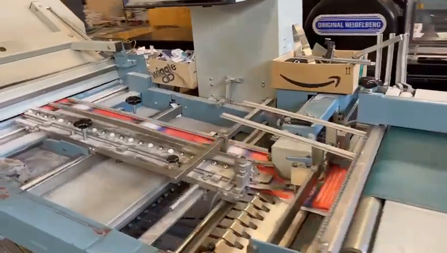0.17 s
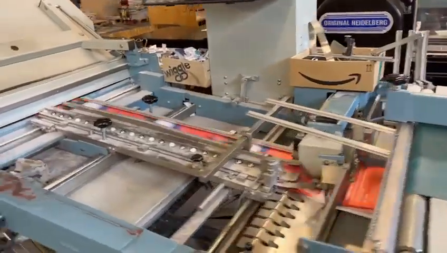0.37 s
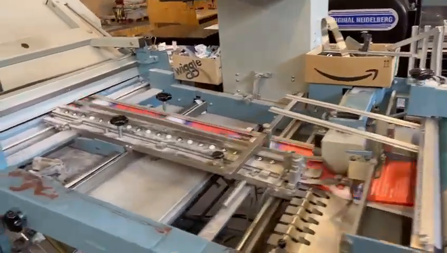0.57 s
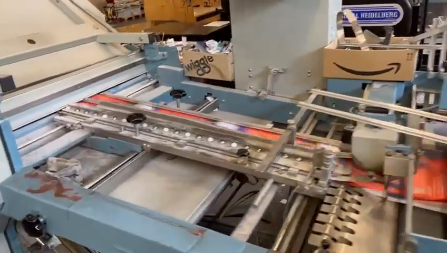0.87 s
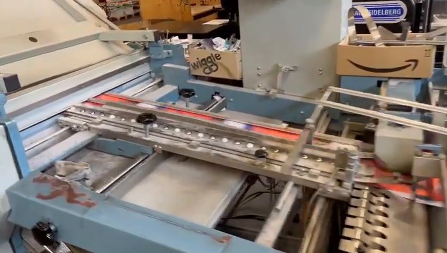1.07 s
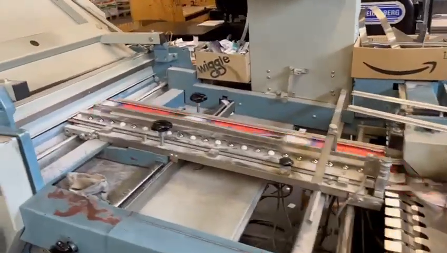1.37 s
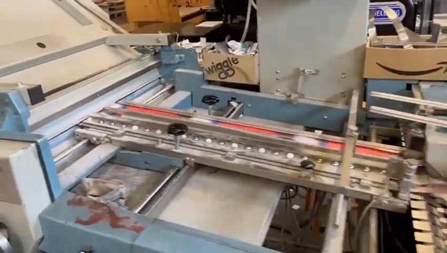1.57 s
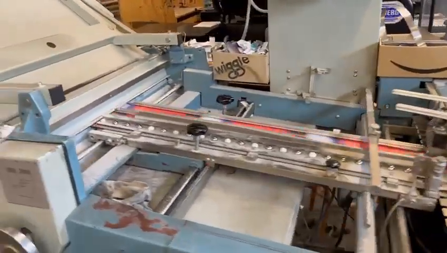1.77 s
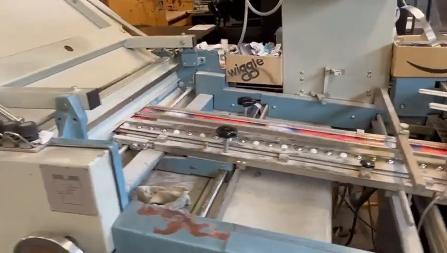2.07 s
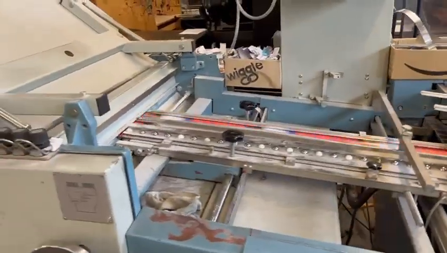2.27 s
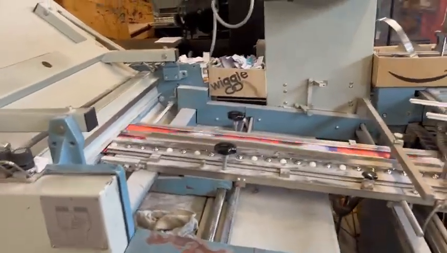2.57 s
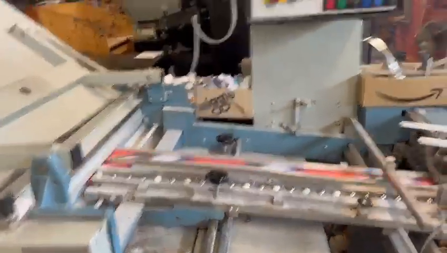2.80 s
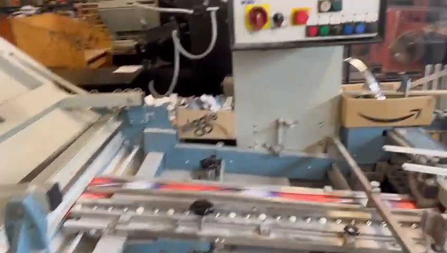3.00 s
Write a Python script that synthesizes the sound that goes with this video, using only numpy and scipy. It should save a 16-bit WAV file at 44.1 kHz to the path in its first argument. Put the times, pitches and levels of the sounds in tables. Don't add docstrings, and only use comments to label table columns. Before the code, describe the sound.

Close beside a running folding machine, each sheet hisses along, knocks three times in quick succession and slaps a stop, with bright ticks and faint crumples, over whirring rollers and rattling guide balls in a small-sounding hall.

```python
import sys
import numpy as np
from scipy import signal
from scipy.fft import rfft, irfft
from scipy.io import wavfile

SR = 44100
rng = np.random.default_rng(int(sys.argv[2]) if len(sys.argv) > 2 else 0)


def generate_wav(sig):
    pcm = np.round(np.clip(np.atleast_2d(sig).T, -1, 1) * 32767).astype(np.int16)
    wavfile.write(sys.argv[1], SR, pcm)


def decibels_to_gain(level_db):
    exponent = np.asarray(level_db, float) / 20
    return 10 ** exponent


N = 138474

# [t/s, peak level/dB, brightest f/Hz, tilt/(dB per octave)]
SLAPS = [(0.088, -9.5, 3470, -4), (0.276, -10, 1900, -5.5), (0.4647, -8.5, 2130, -2),
         (0.6537, -5.5, 1930, -1.5), (0.846, -8.5, 1880, -3), (1.0341, -8.5, 1770, -4),
         (1.2235, -7.5, 1600, 0), (1.4129, -9, 3120, -2.5), (1.6011, -10.5, 3700, -1),
         (1.7914, -18, 2150, -2), (1.982, -12, 3720, -2.5), (2.1743, -10.5, 3430, -1),
         (2.363, -12, 1710, -2), (2.553, -11.5, 3900, -1), (2.741, -11.5, 1550, -1.5),
         (2.9294, -12, 3250, -0.5), (3.1247, -13, 1750, 0)]


def rms_one(x):
    return x / np.sqrt(np.mean(x ** 2) + 1e-20)


def at_hz(points, hz):
    table_hz, values = np.array(points).T
    return np.interp(np.log(hz + 1e-9), np.log(table_hz), values)


def drift(rate_hz):
    r = np.exp(-80 * np.pi * rate_hz / SR)
    slow = signal.lfilter([1], [1, -2 * r, r * r], rng.standard_normal(N // 40 + 2002))[2000:]
    return np.interp(np.arange(N) / 40, np.arange(len(slow)), rms_one(slow))


def resonate(x, hz, width_hz):
    r = np.exp(-np.pi * width_hz / SR)
    poles = [1, -2 * r * np.cos(2 * np.pi * hz / SR), r * r]
    return signal.lfilter([(1 - r * r) / 2, 0, (r * r - 1) / 2], poles, x + 1e-18)


def nearness():
    # [t/s, level/dB]
    near_points = [
        (0, -20),
        (.6, -20.5),
        (1.4, -22),
        (2.001, -24.5),
        (3.14, -23.5),
    ]
    s, db = np.transpose(near_points)
    return np.interp(np.arange(N) / SR, s, db - np.mean(db))


def each_sheet(start_s, rise_s, hold_s, fall_s):
    t, slaps_s = np.arange(N) / SR, np.array(SLAPS)[:, 0]
    before_first_s = 2 * slaps_s[0] - slaps_s[1]
    corners_s = start_s + np.cumsum([0, rise_s, hold_s, fall_s])
    out = np.zeros(N)
    for s in np.append(before_first_s, slaps_s):
        out += np.interp(t, s + corners_s, [0, 1, 1, 0])
    return out


def banded_noise(spectrum, shared_db):
    together = drift(30) + .3 * drift(3)
    band_edges = 28 * 2 ** np.arange(0, 9.1, .5)
    white = rng.standard_normal((2, 2, N))
    out = 0
    for k, (low, high) in enumerate(zip(band_edges, band_edges[1:])):
        band = signal.sosfilt(signal.butter(2, [low, high], "band", fs=SR, output="sos"), white[k % 2])
        flicker_db = shared_db * together + 1.5 * drift(19.7)
        out = out + band * decibels_to_gain(at_hz(spectrum, np.sqrt(low * high)) + flicker_db)
    return rms_one(out)


def knocks(rows, body, rise_s, hold_s, fall_s):
    lead_s = .0026
    t = np.arange(int(.05 * SR)) / SR
    shape = np.minimum(t / rise_s, 1) * np.exp(-np.maximum(t - rise_s - hold_s, 0) / fall_s)
    out = np.zeros((2, N + SR))
    for s, level_db, *own in rows:
        burst = shape * rng.standard_normal((2, len(t))) * decibels_to_gain(2 * rng.standard_normal(len(t)))
        parts, tilt = list(body), 0
        tint_db = rng.standard_normal(len(body) + 1)
        if own:
            top_hz, tilt = own
            parts.append((top_hz, 600, 0.2))
        ring = 0
        for k, (hz, width_hz, db) in enumerate(parts):
            part = resonate(resonate(burst, hz, width_hz), hz, 2 * width_hz) * (-1) ** k
            part = part * np.sqrt(width_hz / np.sum(part[0] ** 2))
            ring = ring + decibels_to_gain(db + tint_db[k] + tilt * np.log2(hz / 2500)) * part
        ring = ring / np.sqrt(np.sum(ring[0] ** 2) / np.sum(shape ** 2))
        i = max(int((s - lead_s) * SR), 0)
        out[:, i:i + len(t)] += decibels_to_gain(level_db - 7.0) * ring
    return out[:, :N]


def roller_whir(near_db):
    # [f/Hz, level/(dB per Hz)]
    whir_spectrum = [(35, -12.5), (90, -5.5), (190, -5.5), (300, -1.5), (700, -4.5), (2000, -7),
                     (5000, -15), (12000, -27)]
    return decibels_to_gain(-25 + 0.42 * near_db) * banded_noise(whir_spectrum, shared_db=0.96)


def guide_balls(near_db):
    balls_per_s = 500
    sizes = decibels_to_gain(1.8 * np.minimum(rng.exponential(1, N), 4)) * (rng.random(N) < balls_per_s / SR)
    clicks = sizes * rng.choice([-1, 1], (2, N))
    dealt = rng.integers(0, 14, N)
    out = 0
    for k, hz in enumerate(np.geomspace(600, 7000, 14)):
        out = out + resonate(clicks * (dealt == k), hz, hz / 22.0) * (900 / hz) ** 0.32
    return decibels_to_gain(-41.5 + near_db) * rms_one(out)


def motor():
    # [f/Hz, width/Hz, level/dB]
    motor_lines = [(94.8, 13, -43.5), (123.3, 12, -51), (141.7, 5.8, -47), (399.9, 19, -45),
                   (499.6, 4.1, -44.5)]
    out = 0
    for hz, width_hz, db in motor_lines:
        line = resonate(resonate(rng.standard_normal(N + SR), hz, width_hz), hz, width_hz)
        out = out + decibels_to_gain(db) * rms_one(line[SR:])
    return out


def steel_frame(near_db):
    # [f/Hz, width/Hz, level/dB]
    frame_modes = [(720, 51, -37.5), (820, 160, -50.5), (990, 180, -50.5), (1476, 230, -40.5),
                   (1910, 370, -35.5)]
    out = 0
    for hz, width_hz, db in frame_modes:
        mode = rms_one(resonate(rng.standard_normal((2, N)), hz, width_hz))
        out = out + decibels_to_gain(db + 3.0 * drift(9.1)) * mode
    return decibels_to_gain(1.64 * near_db) * out


def sheet_slide(near_db):
    # [f/Hz, level/(dB per Hz)]
    slide_spectrum = [(200, -11), (600, -8), (1200, -18.5), (2200, -5), (4000, -3.5), (6500, -20.5),
                      (10000, -3.5), (12000, -12.5)]
    contact = each_sheet(start_s=0.0069, rise_s=0.015, hold_s=0.094, fall_s=0.015)
    rustle_db = 2.5 * drift(260)
    return decibels_to_gain(-29 + 0.8 * near_db + rustle_db) * contact * banded_noise(slide_spectrum, shared_db=-2.4)


def sheet_hum():
    grip = each_sheet(start_s=.01, rise_s=.028, hold_s=.065, fall_s=.045)
    pitch_hz = 190.5 - 6 * (grip - 1) + 1.5 * drift(6)
    return np.sin(2 * np.pi * np.cumsum(pitch_hz) / SR) * decibels_to_gain(-30.5 + .6 * drift(8)) * grip


def plate_entries():
    # [t/s, peak level/dB]
    entry_rows = [(0.0209, -12), (0.2104, -16), (0.3994, -15), (0.5894, -11.5), (0.7794, -15),
                  (0.9694, -18), (1.1568, -17), (1.3464, -14), (1.5344, -12), (1.727, -15), (1.915, -15.5),
                  (2.1101, -15), (2.2967, -12), (2.4854, -12), (2.6738, -17), (2.8629, -17), (3.0604, -21)]
    # [f/Hz, width/Hz, level/dB]
    plate_body = [(507, 255, 0), (1300, 1660, 2), (2210, 1050, 7.5), (4300, 2100, -1), (5700, 670, -20)]
    return knocks(entry_rows, plate_body, rise_s=0.0028, hold_s=0.002, fall_s=0.0071)


def edge_ticks():
    # [t/s, peak level/dB]
    tick_rows = [(0.0214, -17), (0.1104, -22), (0.1296, -19), (0.1652, -12.5), (0.209, -20), (0.3044, -26),
                 (0.352, -19), (0.3973, -14), (0.4224, -20), (0.4834, -25), (0.5355, -13), (0.5864, -24),
                 (0.725, -14), (0.7783, -18), (0.8674, -17), (0.9155, -15.5), (0.9428, -14), (0.9674, -20),
                 (1.1274, -18), (1.1568, -22), (1.296, -15), (1.3458, -19.5), (1.484, -16), (1.5339, -22),
                 (1.6767, -18), (1.723, -20), (1.8666, -21.5), (1.9126, -24), (2.0554, -29), (2.1066, -28),
                 (2.2483, -15), (2.2972, -22), (2.388, -31), (2.4693, -22), (2.4854, -33), (2.625, -18),
                 (2.6748, -26), (2.8034, -31), (2.8626, -16), (2.9124, -33), (2.9554, -25), (3.0064, -19),
                 (3.0276, -15.5), (3.058, -17)]
    # [f/Hz, width/Hz, level/dB]
    guide_body = [(2900, 1140, -1), (4340, 1360, 3), (5640, 750, 3.5), (7450, 2400, -5),
                  (10100, 6700, -37.5)]
    return knocks(tick_rows, guide_body, rise_s=.0012, hold_s=.0015, fall_s=.003)


def buckle_nips():
    # [t/s, peak level/dB]
    nip_rows = [(0.0478, -14), (0.237, -12), (0.427, -18), (0.618, -12), (0.8082, -12), (0.9966, -11.5),
                (1.1874, -13.5), (1.3758, -15), (1.5635, -12), (1.7544, -15), (1.9458, -12.5),
                (2.1331, -12.5), (2.3252, -13), (2.5157, -13.5), (2.7043, -15.5), (2.8922, -20),
                (3.0844, -16.5)]
    # [f/Hz, width/Hz, level/dB]
    roller_body = [(536, 990, -4.5), (970, 440, 8), (2000, 420, 8), (3750, 6300, -2.5), (5170, 600, -14)]
    return knocks(nip_rows, roller_body, rise_s=0.0014, hold_s=0.0018, fall_s=0.006)


def stop_slaps():
    # [f/Hz, width/Hz, level/dB]
    stop_body = [(420, 450, -2.5), (860, 330, -0.5), (1880, 740, 1.5), (2700, 900, -4.5), (3250, 900, 4.9),
                 (3880, 610, 4.5), (5200, 980, -13), (10900, 3600, -16.5)]
    return knocks(SLAPS, stop_body, rise_s=.002, hold_s=.0035, fall_s=.0025)


def light_touches(near_db):
    # [t after the slap/s, level/dB, spread/dB]
    touch_cycle = [
        (.074, -17, 2),
        (.011, -16, 2),
        (.100, -19, 2),
        (.052, -19, 2),
    ]
    # [f/Hz, width/Hz, level/dB]
    touch_body = [(720, 2000, -12), (1770, 1700, 7.5), (4400, 3700, -22.5), (11100, 4000, -11)]
    rows = []
    for slap_s, *_ in SLAPS:
        for after_s, db, spread_db in touch_cycle:
            rows.append((slap_s + after_s, db + spread_db * rng.uniform(-1, 1)))
    return decibels_to_gain(near_db) * knocks(rows, touch_body, rise_s=0.0017, hold_s=0.00083, fall_s=0.0014)


def crumples():
    # [t/s, level/dB, top f/Hz]
    crumple_rows = [(.113, -21.5, 1700), (.303, -20.5, 1700), (.492, -22, 1810), (.682, -25.5, 1830),
                    (.871, -27, 2500), (1.061, -27, 2700), (1.25, -25.5, 2000), (1.44, -38, 2300),
                    (1.63, -24, 2000), (1.82, -26, 2000), (2.01, -32, 2000), (2.2, -29.5, 2000),
                    (2.39, -53, 2000), (2.58, -40, 2000), (2.77, -27, 2000), (2.96, -24, 2000)]
    rise_s, fall_s, snaps_per_s = 0.0039, .035, 4000
    t = np.arange(int(.12 * SR)) / SR
    shape = np.minimum(t / rise_s, 1) * np.exp(-t / fall_s)
    out = np.zeros((2, N + SR))
    for s, db, top_hz in crumple_rows:
        snaps = rng.standard_normal((2, len(t))) * (rng.random(len(t)) < snaps_per_s / SR)
        high = rms_one(resonate(snaps, top_hz, 1330))
        low = rms_one(resonate(resonate(snaps, 510, 370), 510, 600))
        i = int(s * SR)
        out[:, i:i + len(t)] += decibels_to_gain(db) * shape * (high - decibels_to_gain(-3) * low)
    return out[:, :N]


def workshop(x):
    t60_s, room_db = .25, -14
    t = np.arange(int(.5 * SR)) / SR
    tail = rng.standard_normal((2, len(t))) * decibels_to_gain(-60 * t / t60_s) * (t > .004)
    tail = tail / np.sqrt(np.sum(tail ** 2) / 2)
    return decibels_to_gain(room_db) * signal.fftconvolve(x, tail, axes=1)[:, :N]


def scene():
    near_db = nearness()
    running = roller_whir(near_db) + guide_balls(near_db) + motor() + steel_frame(near_db)
    sliding = sheet_slide(near_db) + sheet_hum()
    hits = plate_entries() + edge_ticks() + buckle_nips() + stop_slaps() + light_touches(near_db) + crumples()
    return running + sliding + hits + workshop(hits)


def roll_off(x):
    return signal.sosfilt(signal.butter(12, 11950, fs=SR, output="sos"), x)


def record(dry):
    # [f/Hz, level/dB]
    side_pickup = [(60, -28), (200, -15.5), (600, -5.5), (1100, -4.5), (2300, -10.5), (3300, -4.5),
                   (5000, -21), (6500, 0.5)]
    # [f/Hz, share]
    lean = [(100, 0.0085), (250, 0.023), (600, 0.064), (1200, -0.17), (2400, 0.29), (4500, 0.18),
            (8000, -0.017)]
    # [f/Hz, share]
    turn_early = [(300, -0.063), (900, -0.22), (1500, -.6), (2000, 0.13), (3500, 0.39), (5500, 0.39),
                  (6800, 0.018)]
    hz = np.fft.rfftfreq(N + SR, 1 / SR)
    front, side = rfft(dry, N + SR) / (1 + (38 / (hz + 1)) ** 4)
    peak_db = 10 / (1 + (2 * (hz - 1500) / 310) ** 2)
    side = side * decibels_to_gain(at_hz(side_pickup, hz) + peak_db) / (1 + (hz / 10300) ** 30)
    null_db = -19.5 * np.exp(-((hz - 8490) / 1285) ** 4)
    front = front * decibels_to_gain(null_db) / (1 + (hz / 11810) ** 90)
    side = side + (at_hz(lean, hz) + 1j * at_hz(turn_early, hz)) * front
    mix = irfft(np.array([front + side, front - side]), N + SR)[:, :N]
    return roll_off(mix)


dry = scene()
out = record(dry)
generate_wav(out)
```